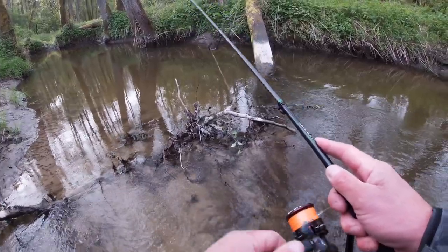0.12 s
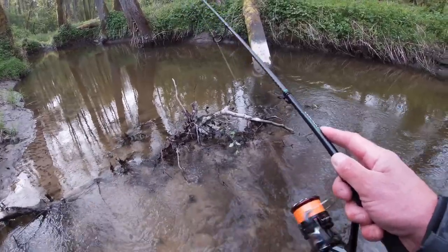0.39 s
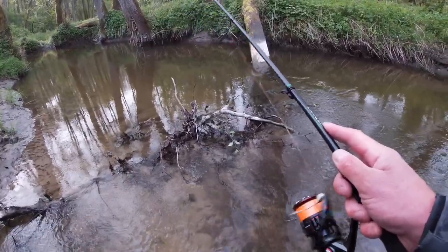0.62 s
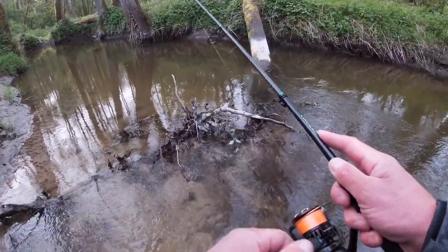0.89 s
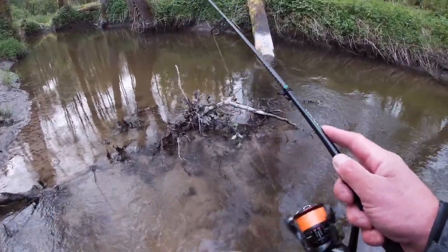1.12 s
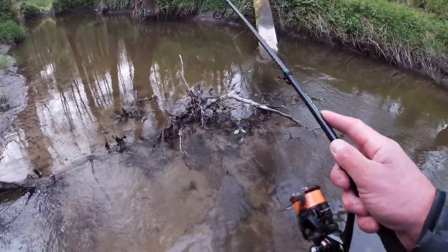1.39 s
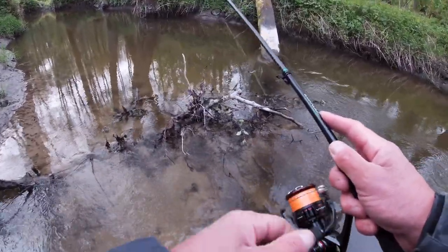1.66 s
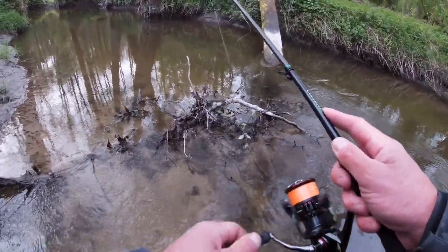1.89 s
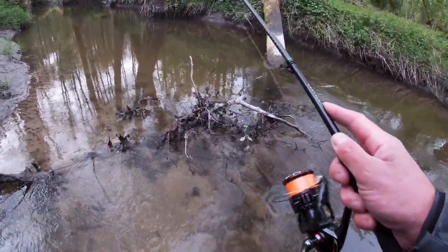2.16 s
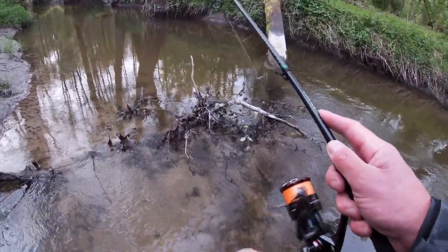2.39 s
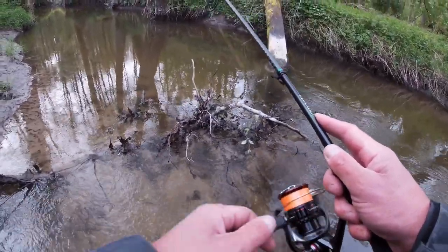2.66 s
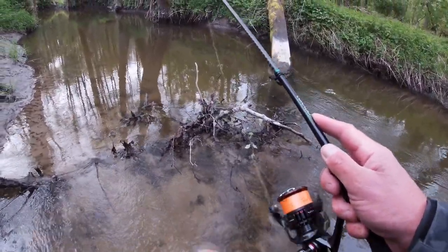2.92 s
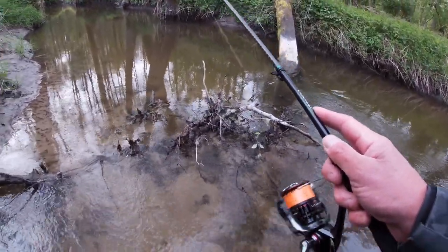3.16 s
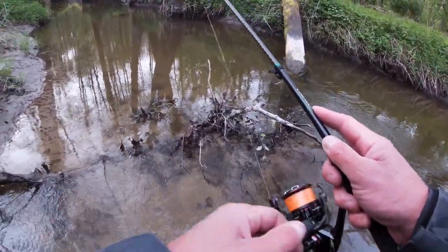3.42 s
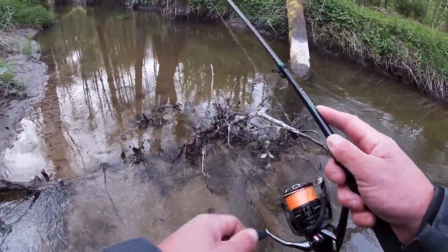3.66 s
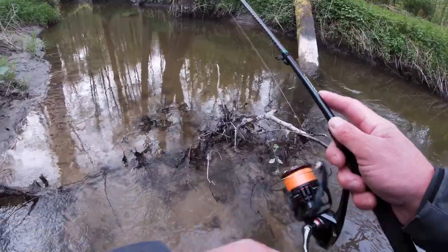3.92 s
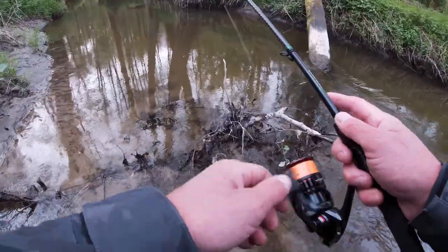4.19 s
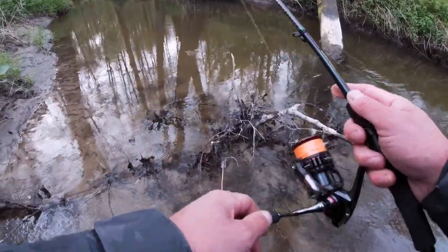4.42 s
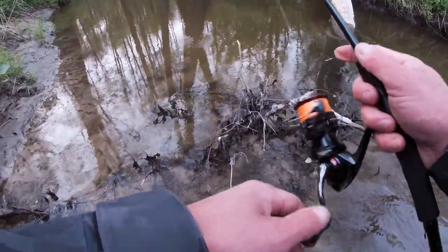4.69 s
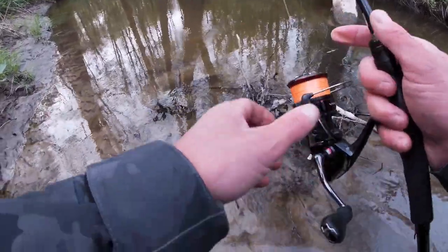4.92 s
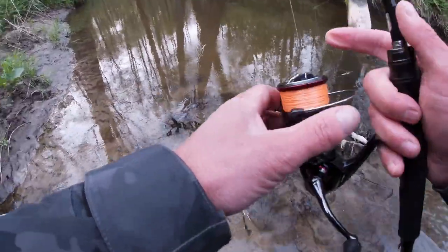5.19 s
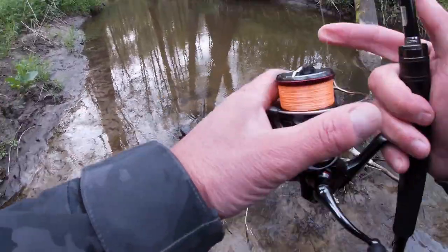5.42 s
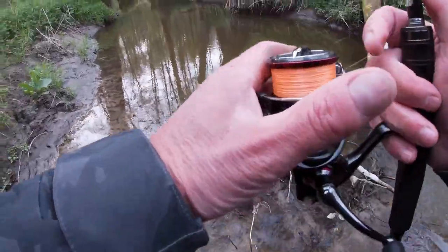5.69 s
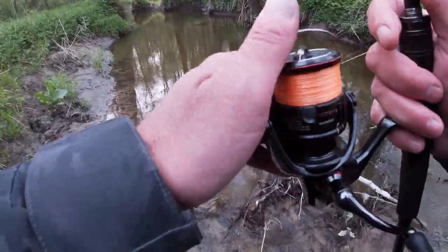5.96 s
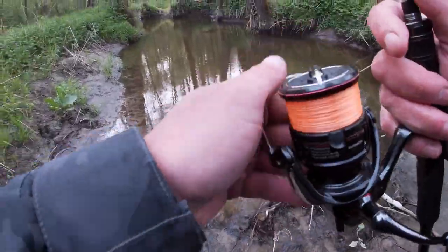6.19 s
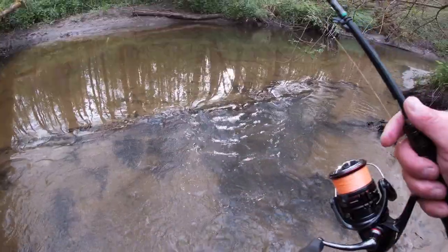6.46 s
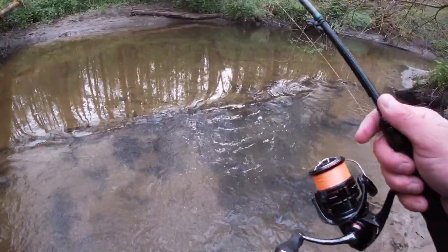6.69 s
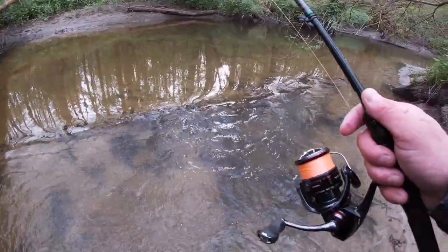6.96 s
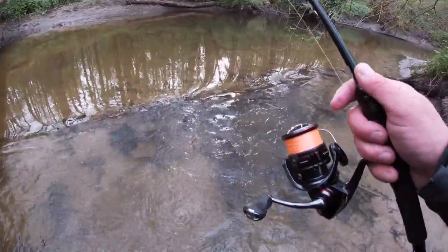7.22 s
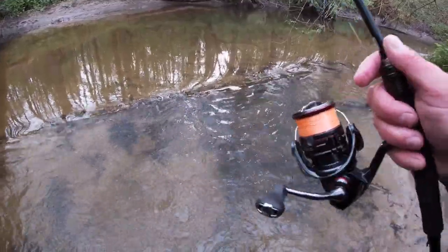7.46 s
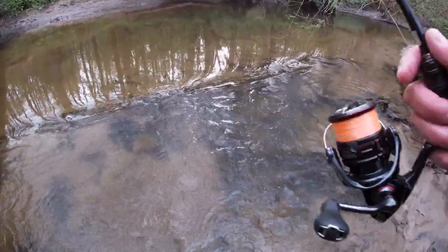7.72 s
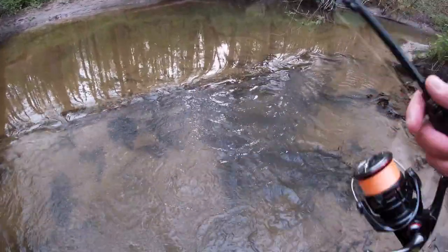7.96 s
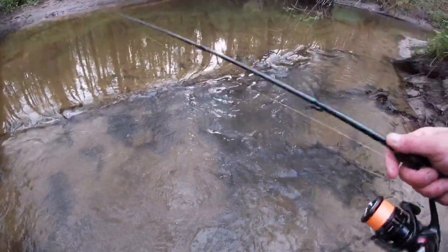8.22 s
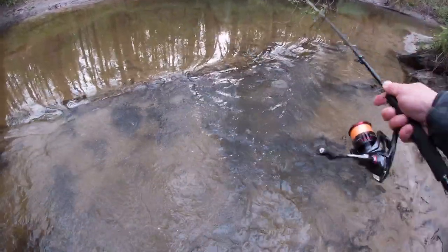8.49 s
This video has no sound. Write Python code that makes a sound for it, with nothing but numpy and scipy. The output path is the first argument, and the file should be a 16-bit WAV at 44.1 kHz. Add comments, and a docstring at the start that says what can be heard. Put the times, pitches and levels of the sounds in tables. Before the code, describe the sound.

A chest-worn microphone in a forest stream picks up quiet murmuring water, leafy hiss, cloth rustles and dull low thumps about twice a second. From 0.15 to 2.3 s a clear bird sings a three-note phrase four times, echoing off trees, with a distant buzzing trill behind. A strap creaks near 0.9 s, with scattered reel ticks. Around 2.8-3.7 s clicks crowd together with knocks and bubbly plops, strongest at 3.25. Short whistles continue from 4 s; a hard knock and tick land at 5.0, strap slips and a click around 5.2. Two diving calls sound at 5.6-5.8 as a hand rubs into a squeak that stops dead. At 6.39 the wire arm snaps, by far the loudest event. After a cut at 6.49 everything is duller: murmur, drips, far rattling birds, a tiny dropout at 7.46, low swells, a faint falling swish from 7.9, soft ticks, and a cast's rush at 8.5.

```python
"""Angler in a forest stream

An angler stands in a quiet forest stream, microphone on the chest. Coloured noise makes the stream, leaves and cloth;
gliding sines make birds, near or far, in a tail of echoes from the trees. Damped sines make water plops, dull
thumps about twice a second and the snap of the reel's wire arm; kicks and puffs of noise make straps and ticks.
After a splice the stream and gear are duller, the thumps nearly stop, and once all sound drops out for a moment."""
import sys
import numpy as np
from scipy import signal
from scipy.fft import rfft, irfft, next_fast_len
from scipy.io import wavfile
from scipy.ndimage import uniform_filter1d, map_coordinates

SR = 44100
rng = np.random.default_rng(int(sys.argv[2]) if len(sys.argv) > 2 else 0)


def generate_wav(sig):
    """Save sig (samples, or channels by samples) to the path in sys.argv[1] as 16-bit PCM at SR."""
    pcm = np.round(np.clip(np.atleast_2d(sig).T, -1, 1) * 32767).astype(np.int16)
    wavfile.write(sys.argv[1], SR, pcm)


def linear_from_db(decibels):
    """Turn decibels (scalar or array-like) into linear amplitude factors; 0 gives 1."""
    return 10 ** (np.asarray(decibels, float) / 20)


N = 379244  # samples

# Levels in the tables are nominal: most sources add a fixed offset when they sound.
SPLICE_S, FADE_S, FADE_DB = 6.49, 0.12, -2  # the early stream, leaves and cloth sink over FADE_S before the splice
GAP_START_S, GAP_END_S = 7.4615, 7.489  # dropout

# Stream up to the splice: time_s, flow_db
FLOW = [(0.0, -68), (0.78, -68), (.84, -62), (1.03, -61), (1.86, -58.5), (2.12, -63.5), (2.3, -61.5),
        (2.55, -57.5), (2.85, -59), (3.24, -53.5), (3.49, -59), (4.09, -54), (4.64, -56.5), (4.78, -56.5),
        (5.28, -59.5), (5.74, -55.5), (5.86, -61), (6.09, -61), (6.24, -61), (6.36, -64)]
# Stream and far bird chorus after the splice: time_s, murmur_db, chorus_db
LATE_LEVELS = [(6.5, -69.5, -62), (6.59, -68, -68.5), (6.72, -62.5, -68), (7.24, -55, -61.5),
               (7.67, -57.5, -60.5), (7.91, -54.5, -60), (8.14, -57, -61.5), (8.37, -61, -58),
               (8.43, -59, -58), (8.6, -55, -54)]
# Noise colours, up to the splice: frequency_hz, density_db (relative, per Hz)
MURMUR_COLOUR = [(41, -30), (70, -3), (107, -9.5), (156, 0.5), (413, -5), (450, -14.5), (580, -37),
                 (990, -120)]
BABBLE_COLOUR = [(260, -31.5), (450, -4), (620, -1), (865, -3), (929, -4), (1960, -8.5), (2500, -12.5),
                 (3250, -42.5), (5500, -120)]
HISS_COLOUR = [(880, -22), (1500, -8.5), (2190, -7), (2720, -4), (2830, -4), (3550, -4.5), (3920, -7.5),
               (5220, -6), (5770, -8.5), (7690, -4.5), (10700, -26), (13100, -29), (16000, -50)]
# Noise colours after the splice: frequency_hz, density_db (relative, per Hz)
LATE_MURMUR_COLOUR = [(41, -64), (70, -33), (118, -29), (146, -5.5), (261, -4.5), (577, -14), (755, -10.5),
                      (945, -22.5), (1280, -22), (2500, -32), (3250, -52), (5500, -120)]
CHORUS_COLOUR = [(880, -17.5), (1500, -10.5), (1770, -11), (2060, -11.5), (2330, -12), (3050, -7.5),
                 (3200, -7.5), (4560, -15.5), (5450, -19), (6750, -33.5), (14000, -46.5)]
DRONE_COLOUR = [(120, -40), (190, -9.5), (260, 0), (340, -8), (520, -30), (900, -120)]
CAST_COLOUR = [(150, -20), (300, -2), (800, 0), (1500, -4), (3000, -6), (4200, -16), (6000, -40),
               (9000, -120)]
# Cloth rustles as the arms move: centre_s, peak_db, half_length_s
RUSTLES = [(.2, -58, 0.19), (.9, -58, 0.13), (1.3, -61.5, 0.11), (1.7, -57, 0.25), (2.08, -58.5, 0.062),
           (2.57, -58.5, 0.19), (3.25, -56, 0.24), (3.7, -57, 0.28), (4.25, -52, 0.2), (4.7, -59, 0.22),
           (5.0, -57.5, 0.088), (5.28, -54.5, 0.11), (5.65, -60.5, 0.23), (6.03, -58, 0.11),
           (6.25, -56, 0.098)]
# Body lurches, heard as low rumble: centre_s, peak_db, half_length_s
LURCHES = [(.2, -69, .3), (1.7, -75, .5), (3.14, -63, 0.1), (3.76, -62, 0.11), (4.5, -74, .2),
           (5.84, -67, .1), (6.27, -75, 0.09), (8.6, -66, 0.072)]
# A low band of murmur swells: centre_s, peak_db, half_length_s
DRONE_SWELLS = [(7.55, -63, .12), (7.75, -55, 0.14), (8.0, -55, 0.14)]
# Air and cloth rush as the rod is cast: centre_s, peak_db, half_length_s
CAST_SWELLS = [(8.45, -57, .05), (8.6, -52, .12)]
LEAVES_DB = -62.5  # steady hiss under the rustles
BABBLE_DB, BABBLE_FLOW, BABBLE_RUSTLE = -60, 0.663, 0.84  # usual level; dB gained per dB of flow and of rustle
WIND_DB, WIND_LATE_DB = -73, -75.5  # rumble on the microphone, early and late

# Dull beats through the chest: start_s, level_db, pitch_hz
THUMPS = [(0.018, -51.5, 68), (0.386, -47.5, 67), (0.839, -47.5, 70), (1.293, -47.5, 66.5),
          (1.752, -50, 63), (2.212, -48, 64.6), (2.683, -48.5, 66), (3.122, -54, 64), (3.573, -49, 68.3),
          (4.026, -48, 71), (4.487, -51.5, 78.1), (4.755, -48.5, 80), (4.942, -50, 66),
          (5.413, -54.5, 64.4), (5.862, -53.5, 79), (6.309, -52, 66.4), (6.629, -68.5, 40.4)]
# Short low hums: start_s, level_db, pitch_hz
HUMS = [(2.451, -53, 112), (2.908, -54.5, 108), (4.761, -54, 127), (5.62, -56, 94.2)]

# Songbird phrase, per note a list of points: time_s (into phrase), offset_hz, offset_db
PHRASE_NOTES = [
    [(0, 130, -8), (.012, 28, -4.5), (.036, -17, -1), (.052, 21, -4)],
    [(.134, -32, -9), (.144, 6, -1.5), (.176, 1, 2), (.186, -40, 5.5)],
    [(.186, 260, -3), (.198, 58, -3.5), (.212, -1.5, -3), (.242, -6, -8)],
]
# Its performances: start_s, pitch_hz (one per note), level_db (one per note)
PHRASES = [(0.154, (2800, 3016, 2490), (-41.5, -41, -40)), (.68, (2700, 2910, 2370), (-43, -40, -40.5)),
           (1.188, (2696, 2900, 2420), (-39.5, -41, -41.5)), (1.833, (2640, 2920, 2390),
           (-40.5, -40, -45.5))]
# A call that dives and levels out, as points: time_s (into call), offset_hz, offset_db
DIVING_NOTES = [
    [(0, 1949, -14), (.01, 949, -15), (.024, 369, -7), (.034, 100, -1), (.05, -2.5, -0.5), (.075, 40, -4),
     (.1, 70.5, -9), (.112, 70.5, -11)],
]
# Its performances: start_s, pitch_hz (one per note), level_db (one per note)
DIVING_CALLS = [(5.555, (4104,), (-48.5,)), (5.747, (4013,), (-45,))]
# Short whistles of other birds: start_s, length_s, first_hz, last_hz, peak_db
WHISTLES = [(2.505, 0.064, 5070, 5160, -54), (2.72, 0.086, 5200, 5290, -60), (2.86, 0.051, 7770, 7450, -54),
            (2.96, 0.055, 7730, 7360, -55), (3.185, 0.043, 2400, 2400, -57), (3.575, .05, 2820, 2800, -60),
            (3.662, .085, 2150, 1980, -57), (4.16, 0.045, 3950, 3500, -49),
            (4.365, 0.054, 3870, 3430, -46.5), (4.655, 0.028, 2940, 3010, -49.5),
            (4.82, 0.055, 3560, 3530, -46), (5.22, 0.041, 3380, 3290, -50), (5.94, 0.04, 3500, 3420, -56),
            (6.09, .06, 3480, 3420, -60), (6.02, 0.028, 2780, 3150, -49), (6.125, 0.033, 3000, 2780, -55),
            (6.155, .025, 2780, 3020, -46.5), (6.183, .03, 3020, 2776, -48), (7.2, .12, 3970, 3860, -59),
            (7.32, 0.038, 4250, 4400, -59), (7.49, 0.03, 3230, 3150, -48), (7.945, 0.042, 2730, 2680, -52)]
# Whistles that bend and return: start_s, length_s, end_hz, middle_hz, peak_db
ARCS = [(2.514, 0.093, 2345, 2460, -59), (3.781, 0.062, 3120, 3560, -57.5),
        (6.536, 0.043, 2500, 2697, -54.5), (6.778, 0.1, 3150, 2385, -56.5)]
# Whistles that slide down and level out: start_s, length_s, first_hz, last_hz, peak_db
SLIDES = [(4.682, .075, 3110, 2570, -49), (5.13, .075, 3010, 2520, -48), (5.375, 0.098, 3020, 2460, -53.5)]
# One long winding whistle: time_s, pitch_hz, level_db
WARBLE = [(2.83, 2420, -68), (2.9, 2550, -60), (2.945, 2720, -53), (2.98, 2520, -53), (3.012, 2400, -49),
          (3.025, 2250, -60), (3.05, 2000, -59), (3.075, 2310, -54), (3.1, 2330, -50), (3.14, 2200, -62),
          (3.16, 1950, -66)]
PEAK_AT, SWELL_DB, DIE_DB = 0.51, -4.5, -6.5  # place of the peak in a short whistle, levels at its two ends
SLIDE_S, SLIDE_DB = 0.028, -8.5  # time constant of a slide, level lost by its end
# Far buzzes of wide falling chirps: start_s, end_s, centre_hz, chirps_per_s, level_db
BUZZES = [(0.382, 1.27, 5046, 109, -56), (6.74, 6.896, 4910, 72, -67.5), (7.99, 8.596, 4970, 82, -56),
          (8.392, 8.6, 3015, 62, -54.5)]
# Far narrow rattles: start_s, end_s, centre_hz, sweep_hz, level_db
RATTLES = [(0.255, 0.382, 4685, 200, -53), (.3, 1.25, 4280, 200, -70), (1.233, 1.443, 7110, 300, -56),
           (1.29, 1.474, 6730, 300, -62), (6.499, 6.702, 4120, 400, -67.5), (7.278, 7.462, 6590, 902, -76),
           (7.358, 7.459, 4260, 890, -58), (7.493, 7.592, 2805, 499, -49.5), (7.488, 7.55, 3800, 400, -59),
           (7.65, 7.73, 3650, 400, -56), (7.6, 7.77, 3050, 350, -56), (7.73, 7.95, 3500, 300, -63),
           (7.8, 7.95, 2700, 200, -62), (7.491, 7.661, 4020, 250, -62.5), (7.678, 7.76, 5330, 150, -70),
           (7.756, 7.8, 4800, 250, -65), (7.781, 7.83, 3080, 200, -53), (7.771, 7.954, 3067, 300, -57),
           (7.863, 8.013, 4700, 250, -56.5), (8.033, 8.453, 4290, 150, -63.5)]
BUZZ_SWEEP, BUZZ_BLUR = 0.325, 0.72  # sweep as a share of the centre; share smeared by leaves
RATTLE_RATE, SMEAR_HZ = 61, 1000  # chirps per s; sweep that is wholly smeared
SAG = .03  # pitch lost over a buzz or rattle, as a share
# Tail of the forest echo: frequency_hz, t60_s
FOREST_T60 = [(2000, 2), (4500, 1.1), (8000, 0.6)]
NEAR_TRUNKS_DB, NEAR_TRUNKS_T60 = 3, .12  # dB, s

# Hard ticks of reel and line: start_s, level_db, pitch_hz, crack_db (dull crack under the tick)
TICKS = [(0.564, -52, 4430, -55.5), (0.7067, -32, 5500, -57.5), (.828, -37, 7300, -45),
         (.842, -35, 7700, -47), (1.9638, -32, 3996, -42.5), (2.082, -36, 5470, -51),
         (2.875, -33.5, 3360, -53), (2.8973, -38, 5400, -71), (2.914, -25.5, 4270, -50),
         (2.9357, -38, 4230, -58), (2.999, -32, 3970, -53), (3.05, -34, 7000, -46),
         (3.146, -38, 7360, -56.5), (3.161, -46, 3000, -45), (3.367, -38, 7740, -57),
         (3.531, -37, 7750, -63), (2.81, -55, 1500, -50), (1.5152, -55, 1400, -50), (2.395, -58, 1000, -53),
         (3.25, -44, 3250, -35.5), (3.256, -33, 6950, -38.5), (3.2785, -31.5, 7960, -43.5),
         (3.4117, -33, 3460, -61), (3.421, -30.5, 3020, -47), (3.4304, -31, 3120, -44),
         (3.453, -28, 4550, -53), (3.5059, -37, 4630, -48), (3.5193, -37, 7740, -46),
         (3.6333, -33.5, 7400, -45.5), (3.872, -40, 3480, -55), (3.8927, -37, 3620, -50),
         (4.4164, -45, 3700, -48), (4.464, -46, 3300, -46), (4.49, -53, 3300, -44.5),
         (4.809, -42, 4800, -46), (5.035, -27, 3520, -38), (5.3058, -24.5, 3320, -46),
         (5.873, -30.5, 7700, -50), (5.9036, -34, 5030, -46), (5.9409, -37, 7000, -46),
         (6.122, -37, 7240, -44), (6.208, -32.5, 6540, -54), (6.2471, -37, 7550, -43.5),
         (6.3103, -28, 3100, -54), (6.4776, -37.5, 6100, -53.5), (7.1697, -49.5, 3170, -49),
         (7.025, -60, 1500, -56.5), (7.095, -50, 2000, -56), (7.295, -51.5, 4790, -65.5),
         (7.522, -45, 2300, -60), (7.635, -52, 2500, -56), (8.069, -40, 2300, -51), (8.099, -43, 2300, -56),
         (8.129, -42, 2200, -65), (8.309, -44, 2400, -55), (8.4547, -41, 3260, -44)]
FAINT_TICK_DB = -46.5  # lowest tick level of many more that come by chance
HANDLING_START_S, HANDLING_END_S = 2.8, 6.4  # the reel is worked
# A creaking strap: time_s, slips_per_s, level_db
CREAK = [(.836, 150, -41), (.9, 160, -42), (1.0, 110, -40), (1.03, 90, -38), (1.072, 75, -42)]
# A slack strap slips once at a time: start_s, level_db
SLACK_SLIPS = [(1.1087, -51), (1.122, -50), (1.1378, -50), (1.162, -48), (5.8414, -49), (5.8733, -48),
               (5.903, -40.5), (5.9236, -43), (5.9422, -43.5), (5.96, -42.5), (6.012, -45.5),
               (6.0438, -42.5), (6.073, -45), (6.1216, -43), (6.2464, -45)]
# A tight strap slips in even runs: first_s, last_s, gap_s, level_db
TIGHT_RUNS = [(5.1455, 5.204, 0.012, -39.5), (5.231, 5.229, .012, -37), (5.2697, 5.2968, 0.014, -37.5),
              (6.554, 6.6114, .029, -52), (6.652, 6.652, .029, -50)]
SLACK_EDGE_DB, TIGHT_BODY_DB = 5.5, -15.5  # sharp edge over a slack slip; dull body under a tight one
# Modes of a strap: pitch_hz, level_db
STRAP_MODES = [(660, 2.5), (1150, -5.5)]
# Dull knocks on the rod: start_s, level_db
KNOCKS = [(1.5152, -42), (1.78, -35), (2.8604, -33), (3.0298, -37), (4.809, -38), (5.035, -25),
          (7.636, -44), (8.0946, -37)]
# Crisp treble ticks close to the microphone: start_s, level_db
CLOSE_TICKS = [(3.1, -60), (3.2771, -46), (3.6333, -53), (5.1557, -58), (5.304, -46), (5.5727, -63),
               (5.9995, -55)]
# A hand drags over the reel, slips quicken into a squeak: time_s, slip_db, slips_per_s, squeak_db, resonance_hz
RUB = [(5.56, -58, 200, -75, 750), (5.6, -49, 220, -66, 784), (5.655, -42.5, 190, -58, 800),
       (5.74, -41, 200, -51, 850), (5.76, -47, 400, -53, 1400), (5.79, -50, 500, -49, 1252),
       (5.82, -50, 550, -47, 1450), (5.834, -49, 550, -48, 1705)]
RUB_END_S = .003  # it stops dead
SNAP_S, SNAP_DB = 6.3917, -2.3
# Modes of the reel's wire arm: pitch_hz, level_db (relative to the snap), t60_s
WIRE_MODES = [(174.3, -28.5, 0.024), (2400, -37.5, 0.019), (4760, -32, 0.032), (5200, -9.5, 0.0047),
              (6880, -18.5, 0.0092), (8320, -0.5, 0.0026), (8830, 1.5, 0.0024), (9658, -22.5, 0.00547),
              (11220, -24, 0.00795), (12800, -26, 0.0059)]
# A falling swish as the rod swings: time_s, pitch_hz, level_db
SWISH = [(7.9, 2750, -78.5), (8.0, 2696, -54), (8.15, 2504, -56), (8.3, 2040, -62), (8.42, 1765, -60),
         (8.5, 1650, -68)]

# Bubbles near the microphone: start_s, level_db, pitch_hz, t60_s, rise_per_s (pitch rise as a share)
PLOPS = [(2.861, -44, 883, 0.086, 16), (2.915, -49, 416, 0.25, 6), (2.965, -51.5, 599, 0.14, 26.5),
         (2.916, -43, 1650, .04, 6), (3.093, -47, 950, .04, 6), (3.145, -47, 1790, .04, 2),
         (3.172, -45, 540, .06, 2), (3.029, -51, 395, 0.046, 6), (3.05, -43.5, 652, 0.097, 13),
         (3.12, -48.5, 698, 0.13, -5.5), (3.225, -44, 604, 0.17, 1.5), (3.231, -36.5, 2560, 0.025, 4),
         (3.24, -37, 1166, 0.04, 8), (3.251, -30, 654, 0.035, 20), (3.258, -36, 850, .04, 22),
         (3.268, -38, 1000, 0.06, 18), (3.432, -33.5, 970, 0.042, 17), (3.475, -50, 466, 0.13, 6.5),
         (3.477, -43, 1416, 0.05, 3), (3.517, -44.5, 847, 0.095, 20), (3.576, -50, 578, 0.32, 6),
         (3.59, -44, 1500, .03, 8), (3.618, -40, 1890, 0.05, 16), (3.812, -48, 1504, 0.053, -1),
         (6.352, -39.5, 500, 0.067, 5.5), (6.357, -49, 1190, 0.063, 13), (6.44, -43, 1445, 0.064, 10),
         (6.9, -56, 800, 0.06, 9), (7.062, -49, 1050, .04, -3), (7.242, -38.5, 1037, 0.072, 13.5),
         (7.423, -50, 659, 0.17, 5.5), (8.3, -51.5, 800, 0.072, 0), (8.31, -43.5, 2150, .05, -4),
         (8.345, -50, 1087, 0.086, 4.5), (8.409, -48, 794, 0.1, -1.5)]
BURST_AT = .5  # share of its t60 after which such a bubble breaks at the surface
STIR_START_S, STIR_END_S = 2.85, 3.65  # the water is stirred close by
TRICKLE_START_S, TRICKLE_END_S = 6.85, 7.46  # drops run off the lure


def unit(x):
    """Scale to rms 1."""
    return x / np.sqrt(np.mean(x ** 2) + 1e-20)


def curves(rows):
    """One value per sample for each column after the time."""
    s, *columns = np.transpose(rows)
    return [np.interp(np.arange(N) / SR, s, column) for column in columns]


def swells(rows, floor_db):
    """Level in dB of bell-shaped swells whose power adds to a steady floor."""
    t = np.arange(0, N / SR + .01, .005)
    power = linear_from_db(floor_db) ** 2
    for s, db, half in rows:
        power = power + linear_from_db(db) ** 2 * np.exp(-((t - s) / half) ** 2)
    return np.interp(np.arange(N) / SR, t, 10 * np.log10(power))


def wobble(rate):
    """A smooth random curve, rate knots a second."""
    knots = rng.standard_normal(int(N * rate / SR) + 4)
    return map_coordinates(knots, [np.arange(N) * rate / SR])


def add(x, s, sound):
    """Mix a sound in at s seconds."""
    part = x[round(s * SR):][:len(sound)]
    part += sound[:len(part)]


def rush(spectrum, patchy_db, spiky_db):
    """Coloured noise of rms 1 with patches of random gain and a fast grainy flutter."""
    z = signal.stft(rng.standard_normal(N) * linear_from_db(spiky_db * wobble(250)), nperseg=512)[2]
    patches = uniform_filter1d(uniform_filter1d(rng.standard_normal(z.shape), 6, 0), 10, 1)
    x = signal.istft(z * linear_from_db(patchy_db * unit(patches)), nperseg=512)[1][:N]
    m = next_fast_len(N)
    f, db = np.transpose([(5.5, -66.5)] + list(spectrum))
    colour = linear_from_db(np.interp(np.log(np.fft.rfftfreq(m, 1 / SR) + 1), np.log(f + 1), db))
    return unit(irfft(rfft(x, m) * colour, m)[:N])


def ring(hz, db, t60, attack, rise=0):
    """A damped sine, cut off 60 dB down, whose pitch may climb or fall exponentially."""
    t = np.arange(int(t60 * SR) + 8) / SR
    envelope = linear_from_db(db - 60 * t / t60) * (1 - np.exp(-t / attack))
    return envelope * np.sin(2 * np.pi * hz * (np.cumsum(np.exp(rise * t)) - 1) / SR)


def burst(low_hz, high_hz, db, t60):
    """A sharp puff of decaying band noise, scaled to a set peak."""
    t = np.arange(int(t60 * SR) + 60) / SR
    puff = (rng.standard_normal(len(t)) + 3 * (t == 0)) * linear_from_db(-60 * t / t60)
    band = signal.butter(2, [low_hz, min(high_hz, 16000)], "band", fs=SR, output="sos")
    puff = signal.sosfilt(band, puff)
    return linear_from_db(db) * puff / np.abs(puff).max()


def background():
    """The bed of noise is swapped at the splice; low rumble runs through."""
    return np.where(np.arange(N) / SR < SPLICE_S, early_bed(), late_bed()) + wind_rumble()


def early_bed():
    """Stream murmur, babble that follows flow and rustle, and hiss of leaves and cloth, all coloured noise."""
    flow_db, = curves(FLOW)
    hiss_db = swells(RUSTLES, LEAVES_DB)
    babble_db = BABBLE_DB + BABBLE_FLOW * (flow_db + 59.5) + BABBLE_RUSTLE * (hiss_db + 58)
    bed = linear_from_db(flow_db + 1.3 * wobble(9)) * rush(MURMUR_COLOUR, patchy_db=1.0, spiky_db=2.0)
    bed += linear_from_db(babble_db + 2.47 * wobble(9)) * rush(BABBLE_COLOUR, patchy_db=1.5, spiky_db=2.5)
    bed += linear_from_db(hiss_db + 0.78 * wobble(12)) * rush(HISS_COLOUR, patchy_db=2.0, spiky_db=1.0)
    return bed * linear_from_db(FADE_DB * np.clip(1 - (SPLICE_S - np.arange(N) / SR) / FADE_S, 0, 1))


def wind_rumble():
    """Wind and body lurches shake the microphone: noise mostly below 100 Hz."""
    early_db, late_db = swells(LURCHES, WIND_DB), swells(LURCHES[-1:], WIND_LATE_DB)
    level_db = np.where(np.arange(N) / SR < SPLICE_S - FADE_S, early_db, late_db)
    colour = [(20, -4), (40, 1.0), (60, -9.0), (100, -30.5), (300, -90.5)]  # Hz, dB per Hz
    return linear_from_db(level_db + 3.0 * wobble(8)) * rush(colour, patchy_db=-2.0, spiky_db=-0.5)


def stream_bubbles():
    """Chance bubbles and shorter droplets ring as damped sines under the level of the stream."""
    x = np.zeros(N)
    for when, pitch, size in rng.random((90, 3)):
        hz = 250 * 7 ** pitch
        add(x, when * N / SR, ring(hz, -3 - 2.7 * np.log(size), 35 / hz, 0.0047, 6))
    for when, pitch, size in rng.random((300, 3)):
        hz = 220 * 9 ** pitch
        add(x, when * N / SR, ring(hz, 3 - 3.8 * np.log(size), 5 / hz, 0.0001))
    return x * linear_from_db(curves(FLOW + [row[:2] for row in LATE_LEVELS])[0])


def thumps():
    """A dull double beat of low damped sines, carried through the chest into the microphone."""
    x = np.zeros(N)
    for s, db, hz in THUMPS:
        add(x, s - .01, ring(hz, db + 7.0, 0.18, 0.016))
        add(x, s + .075, ring(.9 * hz, db - 2.5, .2, .015))
    return x


def birds():
    """Whistles arrive direct and in echoes; trills are far and mostly echo."""
    near, far = whistles(), trills()
    x = near + far
    # no echo crosses the splice or the start of the dropout
    stretch = np.searchsorted([SPLICE_S, GAP_START_S], np.arange(N) / SR)
    for k in range(3):
        inside = stretch == k
        x += inside * forest(inside * (linear_from_db(-3.5) * near + linear_from_db(1.0) * far))
    return x


def whistles():
    """Each whistle is one sine that follows its pitch and level curves."""
    x = np.zeros(N)
    for s, hz, db in notes():
        t = np.arange(s[0], s[-1], 1 / SR)
        edge = np.clip(np.minimum(t - s[0], s[-1] - t) / 0.0044, 0, 1)
        phase = 2 * np.pi * np.cumsum(np.interp(t, s, hz)) / SR
        add(x, s[0], edge * linear_from_db(np.interp(t, s, db)) * np.sin(phase))
    return x * linear_from_db(2.0 * wobble(90))  # moving air roughens the whistles


def notes():
    """Every whistled note as columns of time, pitch and level."""
    out = []
    for shape, rows in ((PHRASE_NOTES, PHRASES), (DIVING_NOTES, DIVING_CALLS)):
        for s, pitches, levels in rows:
            for note, hz, db in zip(shape, pitches, levels):
                out.append(np.transpose(note) + [[s], [hz], [db]])
    u = np.linspace(0, 1, 11)  # place within the note
    swell = np.interp(u, [0, PEAK_AT, 1], [SWELL_DB, 0, DIE_DB])
    for s, length, first, last, db in WHISTLES:
        out.append((s + length * u, first + (last - first) * u, db + swell))
    for s, length, first, last, db in SLIDES:
        slide = np.exp(-(length * u / SLIDE_S) ** 1.7)
        out.append((s + length * u, last + (first - last) * slide, db + SLIDE_DB * u))
    for s, length, end, middle, db in ARCS:
        bend = np.abs(2 * u - 1) ** 2.8
        out.append((s + length * u, middle + (end - middle) * bend, db + 0 * u))
    return out + [np.transpose(WARBLE)]


def trills():
    """Buzzes and rattles: trains of falling chirps, partly smeared into noise by leaves on the way."""
    x = np.zeros(N)
    uneven, leaves = 1 + .25 * wobble(30), wobble(500)
    rows = [(a, b, hz, BUZZ_SWEEP * hz, rate, db, BUZZ_BLUR) for a, b, hz, rate, db in BUZZES]
    rows += [(a, b, hz, sweep, RATTLE_RATE, db, min(sweep / SMEAR_HZ, 1)) for a, b, hz, sweep, db in RATTLES]
    for start, end, centre_hz, sweep_hz, rate, db, blur in rows:
        count = round((end - start) * SR)
        turn = np.cumsum(rate * uneven[round(start * SR):][:count]) / SR % 1  # place within each chirp
        hz = centre_hz * np.linspace(1 + SAG / 2, 1 - SAG / 2, len(turn)) + sweep_hz * (.5 - turn)
        shimmer = 1 - blur + blur * leaves[round(start * SR):][:count]
        chirp_level = np.sin(np.pi * turn) ** 0.18
        add(x, start, linear_from_db(db) * shimmer * chirp_level * np.sin(2 * np.pi * np.cumsum(hz) / SR))
    return x * linear_from_db(1.1 * wobble(15))


def forest(x):
    """Trunks scatter a call at once, then into a long grainy tail; birds and air move, so the tail is ever new."""
    out, step = np.zeros(N), SR // 3  # a new tail every third of a second
    grain = linear_from_db(1.5 * wobble(30))
    for k in range(0, N, step):
        hz, t, z = signal.stft(rng.standard_normal(int(1.3 * SR)), SR, nperseg=128)
        t60 = np.interp(hz, *np.transpose(FOREST_T60))[:, None]
        fall = linear_from_db(-60 * t / t60) / np.sqrt(t60) + linear_from_db(NEAR_TRUNKS_DB - 60 * t / NEAR_TRUNKS_T60)
        tail = signal.istft(z * fall, SR, nperseg=128)[1]
        tail = np.pad(tail * np.roll(grain, -k)[:len(tail)], (450, 0))  # 10 ms to the first trunks
        if x[k:k + step].any():
            add(out, k / SR, signal.fftconvolve(x[k:k + step], tail / np.linalg.norm(tail)))
    return out


def gear():
    """The housing shades the top treble of the gear, all but close ticks and snap; past the splice it is duller."""
    x = ticks() + straps() + knocks() + rub() + swish()
    x = signal.sosfilt(signal.butter(6, 9500, fs=SR, output="sos"), x)
    dull = signal.sosfilt(signal.butter(4, 4800, fs=SR, output="sos"), x)
    x = np.where(np.arange(N) < SPLICE_S * SR, x, dull)
    return x + close_ticks() + wire_snap()


def ticks():
    """Reel and line click: a short high ring and puff over a dull crack; faint ones come by chance."""
    x = np.zeros(N)
    faint = []
    for when, loud, pitch in rng.random((26, 3)):
        s = HANDLING_START_S + when * (HANDLING_END_S - HANDLING_START_S)
        faint.append((s, FAINT_TICK_DB + 6 * loud, 3500 * 2.7 ** pitch, FAINT_TICK_DB - 12 - 7 * pitch))
    for s, db, hz, crack_db in TICKS + faint:
        add(x, s - .0005, ring(hz, db - 5.0, 0.0091, 0.00017))
        add(x, s - .0005, burst(0.75 * hz, 1.35 * hz, db - 7, 0.012))
        add(x, s - .0005, burst(410, 2370, crack_db + 8.0, 0.018))
        add(x, s, ring(270, crack_db - 2, 0.031, 0.00023))
    return x


def straps():
    """Each slip of a strap is one inward kick, then barely two swings of its modes."""
    x = np.zeros(N)
    slips = [(s, db + SLACK_EDGE_DB, db, 1) for s, db in SLACK_SLIPS]
    for first, last, gap, db in TIGHT_RUNS:
        slips += [(s, db, db + TIGHT_BODY_DB, 1) for s in np.arange(first, last + gap / 2, gap)]
    u = (np.arange(300) / SR - .0008) / 0.00014
    kick = -(1 - u ** 2) * np.exp(-u ** 2 / 2)
    for s, edge_db, body_db, taut in slips + creak_slips():
        add(x, s - .0008, linear_from_db(edge_db + 4) * kick)
        for hz, db in STRAP_MODES:
            strap_hz = taut * hz * (1 + 0.1 * rng.standard_normal())
            add(x, s - .001, ring(strap_hz, body_db + db + 11.5, 0.016 / taut ** 2, 0.00075))
    return x


def creak_slips():
    """Slips of the creak at a changing rate, slightly uneven: time, edge dB, body dB, tautness."""
    s, rate, db = np.transpose(CREAK)
    t = np.arange(s[0], s[-1], 1 / SR)
    turns = np.floor(np.cumsum(np.interp(t, s, rate)) / SR)
    slips = []
    for at in t[1:][np.diff(turns) > 0]:
        late, loud = rng.standard_normal(2)
        level = np.interp(at, s, db)
        slips.append((at + .0004 * late, level - 15.0 + 2.3 * loud, level - 7.5 + 1.5 * loud, 1.1))
    return slips


def knocks():
    """A knock on the rod is a very short low ring."""
    x = np.zeros(N)
    for s, db in KNOCKS:
        add(x, s, ring(283, db, 0.018, 0.00034))
    return x


def close_ticks():
    """Crisp puffs of treble noise, close to the microphone."""
    x = np.zeros(N)
    for s, db in CLOSE_TICKS:
        add(x, s, burst(7800, 13000, db - 1, .004))
    return x


def rub():
    """Skin sticks and slips at uneven moments; each slip rings a resonance that climbs as the hand tightens."""
    x = np.zeros(N)
    slip_db, rate, squeak_db, hz = curves(RUB)
    t = np.arange(N) / SR
    on = (t > RUB[0][0]) * np.clip(1 - (t - RUB[-1][0]) / RUB_END_S, 0, 1)
    turns = np.floor(np.cumsum(on * rate * linear_from_db(3.6 * wobble(90))) / SR)
    for k in np.nonzero(np.diff(turns))[0]:
        size, colour = rng.standard_normal(2)
        db = slip_db[k] + 2.5 * size
        add(x, k / SR, ring(hz[k] * linear_from_db(2.5 * colour), db + 5.5, .012, 0.00025))
        add(x, k / SR, ring(330 * linear_from_db(1.5 * colour), db, .014, .0005))
        add(x, k / SR, burst(900, 3200, db - 9, .006))
    squeak = np.sin(2 * np.pi * np.cumsum(hz) / SR) * (0.66 + wobble(250))
    return on * (x + linear_from_db(squeak_db) * squeak)


def wire_snap():
    """The reel's wire arm snaps over: its modes ring at once, and again as it bounces once."""
    x = np.zeros(N)
    for hz, db, t60 in WIRE_MODES:
        add(x, SNAP_S, ring(hz, SNAP_DB + db + 4, t60, 0.00033))
        add(x, SNAP_S + 0.0025, ring(hz, SNAP_DB + db - 13.5, t60, .0003))
    return x


def swish():
    """The rod swings through the air: a falling tone blurred by random flutter."""
    hz, db = curves([(7.85, 2810, -120)] + SWISH + [(8.55, 1660, -120)])
    return linear_from_db(db) * np.sin(2 * np.pi * np.cumsum(hz) / SR) * wobble(300)


def hums():
    """Short low hums: damped sines with a soft start."""
    x = np.zeros(N)
    for s, db, hz in HUMS:
        add(x, s - .02, ring(hz, db + 7.0, 0.61, 0.036))
    return x


def plops():
    """Trapped air rings as damped sines: placed plops, a cloud freed by stirring, a trickle off the lure."""
    x = np.zeros(N)
    for s, db, hz, t60, rise in PLOPS:
        plop = ring(hz, db + 3.5, t60, 0.002, rise)
        t = np.arange(len(plop)) / SR
        add(x, s - .002, plop * np.clip((BURST_AT * t60 - t) / .006 + 1, 0, 1))
    for when, pitch, size in rng.random((130, 3)):
        s, hz = STIR_START_S + when * (STIR_END_S - STIR_START_S), 400 * 5 ** pitch
        add(x, s, ring(hz, -53.5 - 1.8 * np.log(size), 22 / hz, 0.0011, 14))
    for when, pitch, size in rng.random((45, 3)):
        s, hz = TRICKLE_START_S + when * (TRICKLE_END_S - TRICKLE_START_S), 550 * 3.5 ** pitch
        add(x, s, ring(hz, -59 - 2.5 * np.log(size), 14 / hz, .0005, 12))
    return x * linear_from_db(3 * wobble(220))  # bubbles wobble as they ring


def late_bed():
    """After the splice: duller murmur, far bird chorus, low drone swells and the rush of the cast."""
    murmur_db, chorus_db = curves(LATE_LEVELS)
    bed = linear_from_db(murmur_db + 1.8 * wobble(6.2)) * rush(LATE_MURMUR_COLOUR, patchy_db=2.5, spiky_db=0.0)
    bed += linear_from_db(chorus_db) * rush(CHORUS_COLOUR, patchy_db=3.0, spiky_db=1.5)
    bed += linear_from_db(swells(DRONE_SWELLS, -88)) * rush(DRONE_COLOUR, patchy_db=2, spiky_db=2.0)
    bed += linear_from_db(swells(CAST_SWELLS, -90)) * rush(CAST_COLOUR, patchy_db=2.5, spiky_db=2)
    return bed


def scene():
    """All sources reach one microphone; the two channels differ only by a flickering trace, mostly treble."""
    mono = background() + stream_bubbles() + thumps() + birds() + gear() + hums() + plops()
    side = linear_from_db(-33) * (np.gradient(mono) + 0.25 * mono) * wobble(400)
    return np.array([mono + side, mono - side])


def low_pass(x):
    """Removes everything above the highest recorded frequency."""
    return signal.sosfilt(signal.butter(12, 16540, fs=SR, output="sos"), x)


def record(dry):
    """The recorder limits the band; the sound drops out briefly."""
    t = np.arange(N) / SR
    limited = signal.sosfilt(signal.ellip(8, .5, 60, 16300, fs=SR, output="sos"), dry)
    mix = limited * ((t < GAP_START_S) | (t > GAP_END_S))
    return low_pass(mix)


dry = scene()
out = record(dry)
generate_wav(out)
```